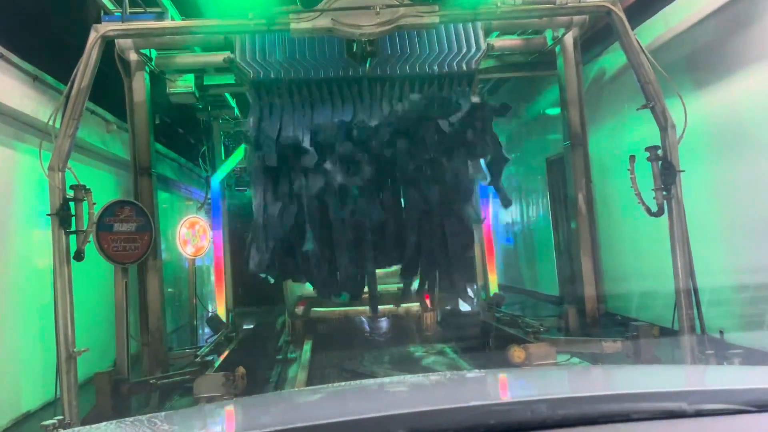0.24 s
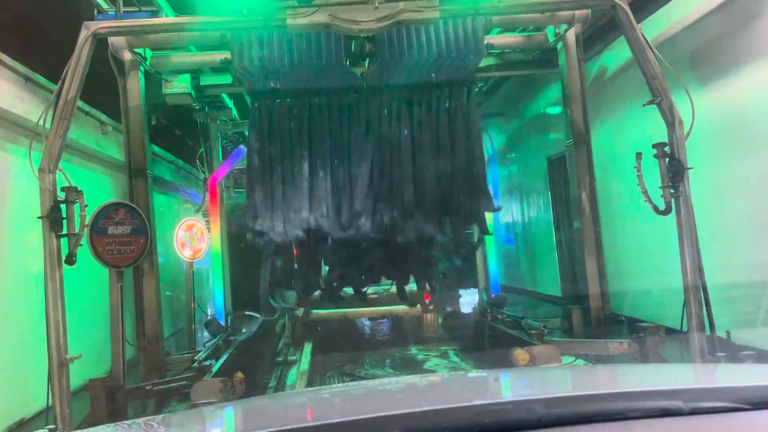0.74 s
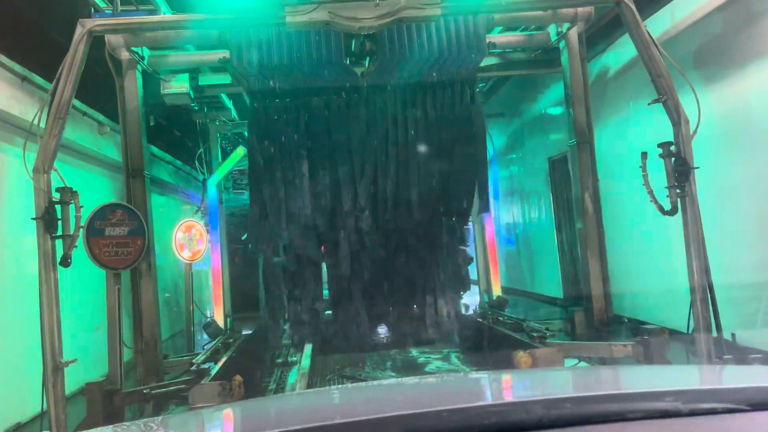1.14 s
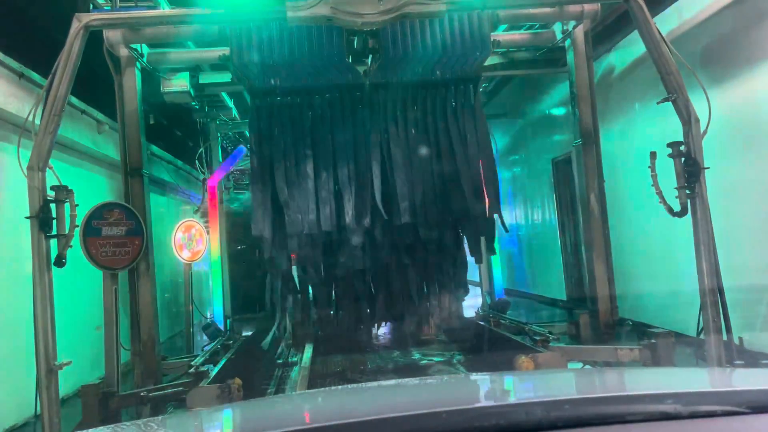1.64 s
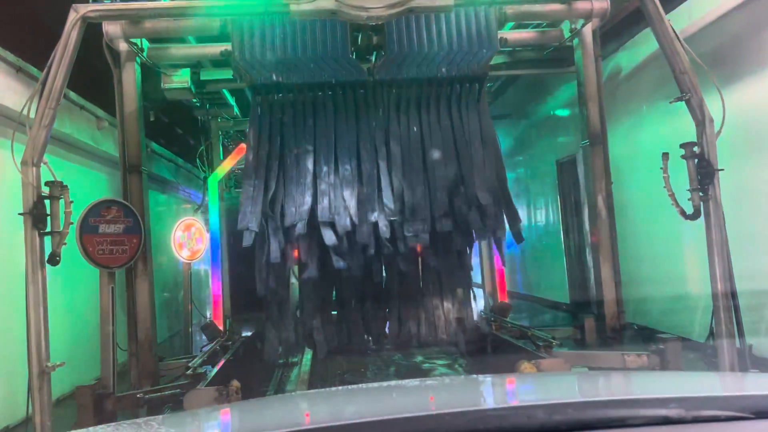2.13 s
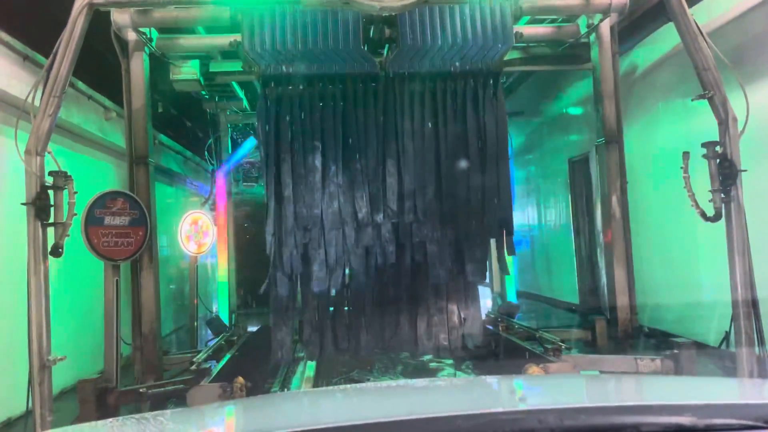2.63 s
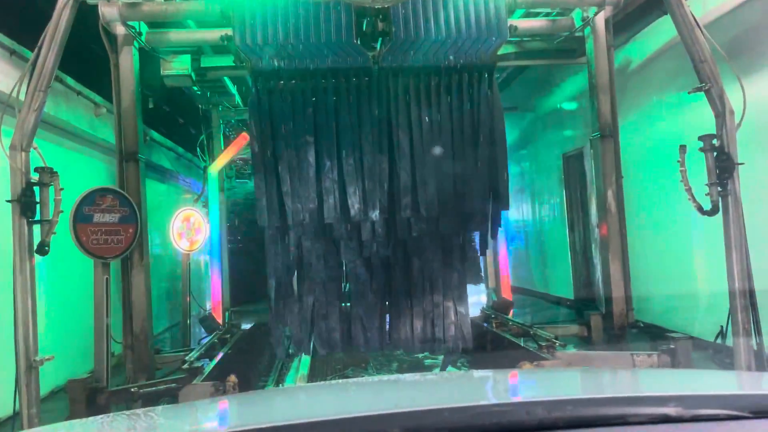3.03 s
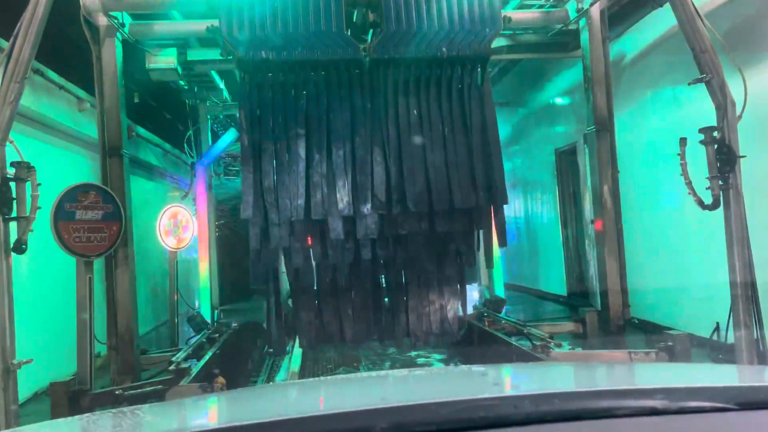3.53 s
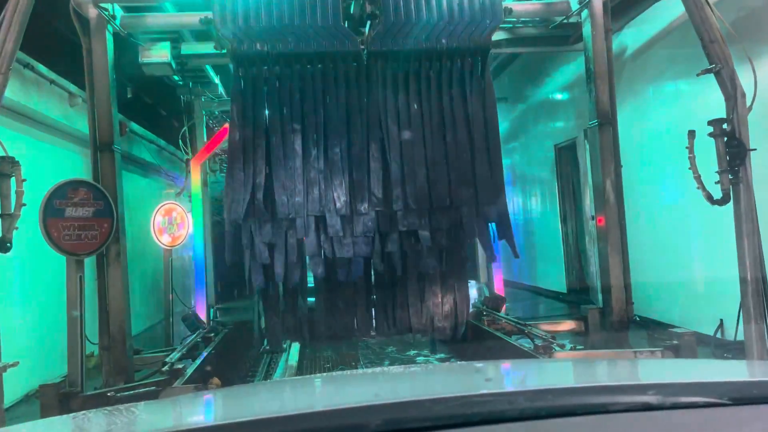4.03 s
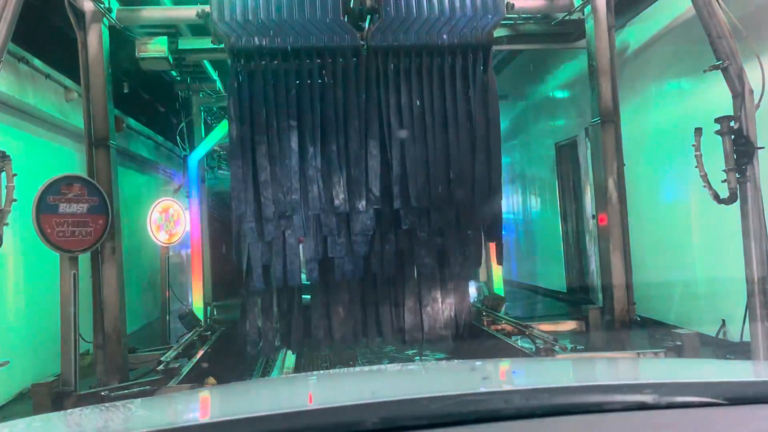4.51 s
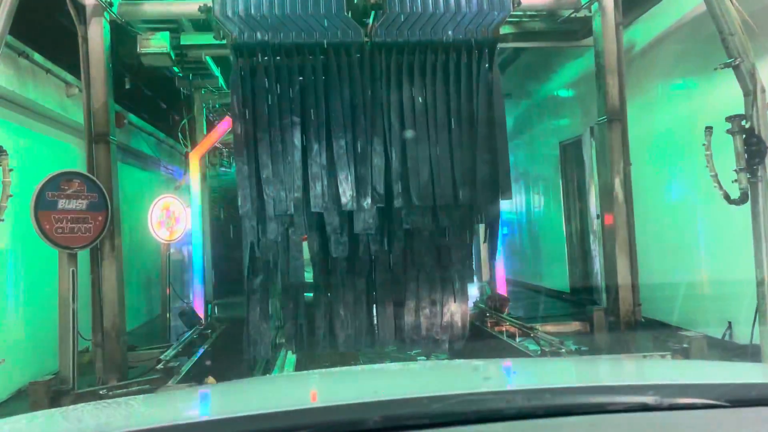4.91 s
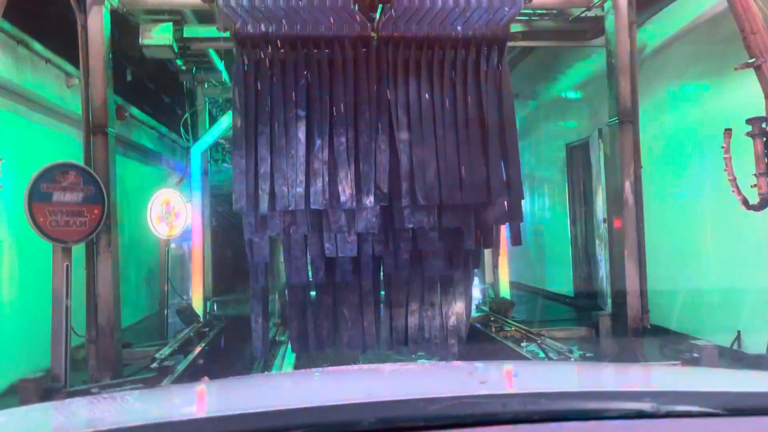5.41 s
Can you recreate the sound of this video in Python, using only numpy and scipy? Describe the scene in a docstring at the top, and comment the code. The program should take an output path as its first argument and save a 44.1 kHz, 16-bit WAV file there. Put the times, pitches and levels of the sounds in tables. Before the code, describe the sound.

Close microphone handling thumps and ticks over the steady low drone of car wash machinery outside the car.

```python
"""Inside a car in a wash tunnel

Pumps, motors and spray come muffled through the body of a closed car, which passes mostly bass.
Close by, a hand shifts its grip on the microphone housing: impacts give dull bumps and ticks, the
unsteady hand shakes it, and friction of skin and cloth rustles. Narrow hisses squeak a little."""
import sys
import numpy as np
from scipy import signal
from scipy.fft import rfft, irfft, next_fast_len
from scipy.io import wavfile
from scipy.ndimage import uniform_filter1d, minimum_filter1d

SR = 44100
rng = np.random.default_rng(int(sys.argv[2]) if len(sys.argv) > 2 else 0)


def transcribe(u):
    """Save the signal u as a 16-bit wav file named by the first command-line argument.

    u: samples, shape (n,) or (channels, n), limited to [-1, 1]; the rate is SR.
    q: integer samples, one column per channel.
    """
    v = np.clip(np.atleast_2d(u).T, -1, 1)
    q = np.round(v * 32767).astype(np.int16)
    wavfile.write(sys.argv[1], SR, q)


N = 249606


def gain_of(db):
    """Amplitude ratio of a level in decibels."""
    return 10 ** (np.asarray(db) / 20)


def unit_rms(x):
    """Normalisation to a mean power of 1."""
    return x / np.sqrt(np.mean(x ** 2) + 1e-20)


def curve_at(points, hz):
    """Interpolation on a logarithmic frequency axis."""
    knots_hz, values = np.transpose(points)
    return np.interp(np.log(hz + 1e-3), np.log(knots_hz + 1e-3), values)


def pan(left_db):
    """Level difference between the channels, as left and right gains."""
    return gain_of([left_db / 2, -left_db / 2])[..., None]


def add(mix, start_s, sound):
    """Superposition of a stereo sound on the mix."""
    part = mix[:, round(start_s * SR):][:, :sound.shape[1]]
    part += sound[:, :part.shape[1]]


def noise_pair(count, correlation):
    """Partial coherence: two channels of white noise share a component."""
    left, other = rng.standard_normal((count, 2)).T
    return np.array([left, correlation * left + np.sqrt(1 - correlation ** 2) * other])


def coloured(x, spectrum, tilt_db=0):
    """Zero-phase filtering by a spectrum, tilted by tilt_db an octave between 60 and 600 Hz."""
    size = x.shape[-1]
    hz = np.fft.rfftfreq(size, 1 / SR)
    octaves = np.log2(np.clip(hz, 60, 600) / 130)
    return irfft(rfft(x) * gain_of(curve_at(spectrum, hz) + tilt_db * octaves), size)


def resonant_noise(hz, width_hz, correlation):
    """Resonance by heterodyning: noise is shifted down by hz, smoothed twice and shifted back."""
    carrier = np.exp(2j * np.pi * hz * np.arange(N) / SR)
    pole = np.exp(-np.pi * width_hz / SR)
    baseband = signal.lfilter([1], [1, -2 * pole, pole ** 2], noise_pair(N, correlation) / carrier)
    return unit_rms((carrier * baseband).real)


def swell(start_s, rise_s, hold_s, fall_s, db, foot_db=-23):
    """Exponential rise up to start_s, hold and decay; subtracting the foot brings both ends to zero."""
    t = np.arange(N) / SR - start_s
    away = np.maximum(-t / rise_s, 0) + np.maximum((t - hold_s) / fall_s, 0)
    return gain_of(db) * np.maximum(gain_of(foot_db * away) - gain_of(foot_db), 0)


def flicker(depth_db, samples):
    """Random amplitude modulation: a gain whose level is smoothed noise."""
    return gain_of(depth_db * unit_rms(uniform_filter1d(rng.standard_normal(N), samples)))


def diffuse_noise(spectrum, patchy_db):
    """A partly coherent sound field: random short-time spectra with drifting louder patches."""
    # Each row: frequency in Hz, left-right correlation.
    coherence = [(60, 1), (150, 0.94), (360, 0.91), (900, 0.39), (2210, 0.018), (5440, 0.49), (13400, 0.1)]
    # Each row: frequency in Hz, excess of left over right in dB.
    balance = [(60, 0.5), (180, 0), (520, 0.86), (1540, 0.96), (4550, 0.0), (13400, 0.5)]
    frames, hz = N // 512 + 5, np.fft.rfftfreq(2048, 1 / SR)
    left_re, left_im, other_re, other_im, patches = rng.standard_normal((frames, len(hz), 5)).T
    patches = unit_rms(uniform_filter1d(uniform_filter1d(patches, 20, axis=0), 6, axis=1))
    correlation = curve_at(coherence, hz)[:, None]
    left = left_re + 1j * left_im
    right = correlation * left + np.sqrt(1 - correlation ** 2) * (other_re + 1j * other_im)
    gains = gain_of(curve_at(spectrum, hz)[:, None] + patchy_db * patches) * pan(curve_at(balance, hz))
    _, noise = signal.istft(gains * np.array([left, right]), nperseg=2048, noverlap=1536)
    return unit_rms(noise[:, :N])


def tunnel():
    """Transmission loss: the car body passes the machines' rumble and only a faint hiss of spray."""
    # Each row of both: frequency in Hz, relative spectral density in dB.
    rumble_spectrum = [(12, -39), (20, -8), (112, -1.5), (161, -7.5), (200, -9), (260, -12.5), (373, -16),
                       (404, -14), (483, -23), (524, -19.5), (556, -22.5), (1010, -34), (2400, -52.5),
                       (3120, -68.5), (5280, -120)]
    spray_spectrum = [(1200, -33), (2000, -2), (2500, -6), (3100, -3), (3700, -8.5), (4400, -5),
                      (5200, -12), (6200, -11.5), (6900, -21), (9500, -23), (10500, -50.5), (13000, -68)]
    # Each row: time in seconds, rumble level in dB, spray level in dB.
    drift = [(0.0, -26.5, -71.5), (0.3, -31.5, -67), (1.0, -30, -65), (1.6, -29.5, -67.5),
             (2.5, -29.5, -63.5), (3.4, -28.5, -63.5), (4.3, -29, -62.5), (4.9, -29, -61),
             (5.4, -28, -62.5), (5.66, -25, -63)]
    times_s, rumble_db, spray_db = np.transpose(drift)
    t = np.arange(N) / SR
    rumble = diffuse_noise(rumble_spectrum, patchy_db=1.4) * gain_of(np.interp(t, times_s, rumble_db))
    spray = diffuse_noise(spray_spectrum, patchy_db=2.05) * gain_of(np.interp(t, times_s, spray_db))
    return rumble + spray


def motor_hums():
    """Motors and pumps hum as narrow-band noise, which is heard as wavering tones."""
    # Each row: centre in Hz, width in Hz, level in dB.
    bands = [(33, 13, -40), (59.57, 4, -38), (523.3, 11, -52), (1032, 40, -63.5), (1618, 400, -63.5),
             (8500, 300, -92.5)]
    return sum(gain_of(db) * resonant_noise(hz, width_hz, correlation=.9 - hz / 12000)
               for hz, width_hz, db in bands)


def pulse(spectrum, size, tilt_db=0):
    """Windowed impulse response of a spectrum, with a peak of 1 at its middle."""
    response = coloured(signal.unit_impulse(size, "mid"), spectrum, tilt_db) * np.hanning(size)
    return response / abs(response).max()


def housing_bumps():
    """Impact: a soft push plus a knock of the stiffer shell, the hand being nearer the left port."""
    # Each row: time in seconds, push level in dB, hardness in dB an octave, knock level in dB.
    impacts = [(0.028, 0.5, 0.5, -35.5), (0.118, -20, -16, -40), (0.241, -22, -6, -37),
               (0.505, -1, -4, -30.5), (0.841, -14, 4, -41), (0.861, -11, 6.5, -26), (0.882, -8.5, -1, -25),
               (0.9, -12.5, 6.5, -48), (1.042, -18.5, -2, -44), (2.052, -11.5, -7.5, -43),
               (2.077, 7.5, 3.5, -20.5), (2.184, -27, -1, -30), (2.193, -9.5, -8, -40),
               (2.213, -16.5, 3.5, -25), (2.221, -7.5, 2.5, -40), (2.244, -12.5, 8, -22),
               (2.253, -5.5, 3, -44), (2.315, -6, 0.5, -21), (2.373, -15, 17.5, -26.5),
               (2.39, -15, 2, -24.5), (2.453, -7, 9, -52), (2.478, -11, -5.5, -46), (2.506, -22, 2, -42),
               (2.536, -17.5, -6.5, -38), (3.087, -6, 0.5, -16), (3.121, -4.5, -3, -19),
               (3.139, -9, -3.5, -54), (3.237, -3, -5, -27.5), (3.461, -16.5, 0, -46),
               (3.49, -19, 1.5, -51), (4.283, 9, 2, -17.5), (4.393, 1.5, -2.5, -27.5), (4.454, 0, -3, -27),
               (4.492, -8.5, -1.5, -50), (4.581, -6, -3, -39), (4.611, -6, -2, -32), (4.651, -5, 0.5, -42),
               (4.732, -7.5, -3, -47), (4.786, -5, -2, -30.5), (4.819, -13, -2, -31),
               (4.907, -9, -9.5, -46), (5.391, 3.5, 3, -10), (5.413, -9.5, -0.5, -27),
               (5.449, -34, -4.5, -28), (5.471, -19, 1, -27), (5.502, -19, -0.5, -31),
               (5.539, -15.5, -3, -22), (5.547, -11.5, -12, -19.5)]
    # Each row of both: frequency in Hz, relative level in dB.
    push_spectrum = [(25, -31.5), (50, -24.5), (70, -4), (100, -2.5), (140, 1.5), (200, -3.5), (280, -12.5),
                     (400, -22), (600, -37), (1000, -66.5), (2000, -140)]
    knock_spectrum = [(150, -51), (300, -15.5), (450, -0.5), (570, 8.5), (750, -10), (1000, -18.5),
                      (1600, -20), (3000, -64), (6000, -140)]
    out, size = np.zeros((2, N + SR)), 4096
    knock = pulse(knock_spectrum, size)
    for time_s, push_db, hardness_db, knock_db in impacts:
        push = pan(2.5) * gain_of(push_db) * pulse(push_spectrum, size, hardness_db)
        left, right = push + pan(2.2 * rng.uniform(-1, 1)) * gain_of(knock_db) * knock
        add(out, time_s, np.array([left, np.roll(right, 12)]))  # the far port hears it later
    return out[:, size // 2:][:, :N]  # centres each pulse on its time


def hand_shakes():
    """Structure-borne noise: the hand's low shaking and deeper sway reach both sides nearly alike."""
    # Each row: start in seconds, hold in seconds, level in dB.
    shakes = [(0.121, 0.086, -27), (0.853, .04, -21), (0.959, 0.1, -29.5), (1.991, 0.076, -22.5),
              (2.183, 0.082, -21.5), (2.345, .05, -23.5), (2.464, .05, -22), (3.11, .025, -17.5),
              (3.445, .07, -26.5), (5.415, 0.014, -23), (5.496, 0.077, -26)]
    # Each row: start, hold and fall in seconds, level in dB.
    sways = [(0.868, 0.024, 0.15, -13.5), (2.19, .07, .06, -21.5), (2.43, .06, .05, -28),
             (3.1, .015, .04, -15.5), (3.447, 0.097, .08, -30.5), (5.408, .02, .06, -21.5)]
    # Each row of both: frequency in Hz, relative spectral density in dB.
    shake_spectrum = [(40, -39), (75, 3.5), (120, 1.5), (180, -10.5), (300, -21.5), (600, -25),
                      (1200, -73.5), (2400, -140)]
    sway_spectrum = [(12, -37.5), (25, -2.5), (40, 1.5), (65, 13), (90, 8), (200, -65), (600, -140)]
    shake = unit_rms(coloured(noise_pair(N, correlation=.95), shake_spectrum))
    sway = unit_rms(coloured(noise_pair(N, correlation=1), sway_spectrum))
    shake_rise_s, shake_fall_s, sway_rise_s = .033, .05, .03
    shake *= sum(swell(start_s, shake_rise_s, hold_s, shake_fall_s, db) for start_s, hold_s, db in shakes)
    sway *= sum(swell(start_s, sway_rise_s, hold_s, fall_s, db) for start_s, hold_s, fall_s, db in sways)
    return pan(1.2) * (shake + sway)


def rubs():
    """Friction of skin and cloth gives grainy noise; a tilt trades its dull part for its bright part."""
    # Each row: start, rise, hold and fall in seconds, level in dB, tilt in dB.
    strokes = [(0.782, 0.079, 0.035, 0.028, -55, 2), (0.859, 0.063, 0.0055, 0.01, -47, 3),
               (.875, .005, .005, 0.1, -65, 7), (2.37, 0.0046, .005, 0.07, -60, 5.5),
               (2.457, 0.064, .003, .09, -53, 3), (2.755, 0.033, .003, .04, -62, 4),
               (3.087, .004, 0.037, 0.015, -44, 1), (3.198, 0.049, 0.021, 0.075, -52, -3.5),
               (5.383, .005, 0.074, .03, -60.5, 4.5), (5.527, 0.16, .06, 0.2, -47.5, -0.5)]
    # Each row: frequency in Hz, relative spectral density in dB.
    spectrum = [(500, -33.5), (900, -7), (1400, -2), (2000, -6), (3200, -15), (5500, -20), (9400, -20.5),
                (10100, -41.5), (11000, -29), (12500, -43)]
    grain = flicker(depth_db=2.3, samples=80)
    noise = unit_rms(coloured(grain * noise_pair(N, correlation=.29), spectrum))
    dull = signal.lfilter(*signal.butter(2, 3500, fs=SR), noise)
    bright = noise - dull
    return pan(2.5) * sum(swell(*shape) * (dull * gain_of(-tilt_db) + bright * gain_of(tilt_db))
                          for *shape, tilt_db in strokes)


def ticks():
    """Impulse excitation: a sharp click and its brief decaying crackle sound in three bands."""
    # Each row: time in seconds, then peak levels in dB of the dull, middle and bright bands before panning.
    clicks = [(0.786, -50, -48, -52), (0.815, -37, -36, -50), (0.827, -46, -58, -47),
              (0.841, -34, -52, -33), (0.853, -31, -39, -41), (0.865, -19.5, -28.5, -39),
              (0.874, -38, -48, -54), (0.882, -42, -68, -37.5), (2.184, -49, -61, -54),
              (2.212, -44, -67, -52), (2.243, -50, -67.5, -46), (2.375, -45, -63, -39),
              (2.455, -17, -30.5, -35), (2.471, -31.5, -40, -37), (2.48, -28.5, -40, -47),
              (2.497, -49, -50, -48), (2.529, -48, -50, -52), (2.742, -42, -56, -60),
              (3.084, -31, -43, -56), (3.12, -23.5, -26.5, -49), (3.432, -50, -47, -57),
              (4.587, -42, -47, -66), (4.804, -43, -44, -67), (5.376, -32.5, -54, -61),
              (5.39, -23, -41, -49), (5.4, -43, -43, -31), (5.415, -40, -39, -31), (5.537, -30, -55, -43),
              (5.593, -37, -63, -56.5)]
    # Each row of all three: frequency in Hz, relative level in dB.
    dull = [(300, -70), (700, 8), (1200, 4), (1700, -10), (2400, -23), (4000, -72), (8000, -120)]
    middle = [(600, -77.5), (1500, -9), (2100, -4), (2900, 1.5), (3700, -6), (4800, -21), (9000, -89)]
    bright = [(1200, -77.5), (3000, -21.5), (4300, -1.5), (5200, -2), (6300, -1.5), (9400, -7),
              (10100, -29.5), (12500, -27.5), (14000, -74)]
    out, t = np.zeros((2, N)), np.arange(-256, 768) / SR
    impulse = np.array([t == 0, np.roll(t == 0, 3)])  # slightly later on the right
    crackle_envelope = gain_of(-15 - 60 * t / .009) * (t > 0)  # falls 60 dB in 9 ms
    for time_s, *peaks_db in clicks:
        burst = impulse + crackle_envelope * noise_pair(len(t), correlation=.4)
        place = pan(6 + 7.5 * rng.uniform(-1, 1))
        for db, spectrum in zip(peaks_db, (dull, middle, bright)):
            band = coloured(burst, spectrum)
            add(out, time_s + t[0], gain_of(db) * place * band / abs(band).max())
    return out


def hisses():
    """Band-limited noise: one resonance gives each fluttering hiss a slight squeak."""
    # Each row: start, rise, hold and fall in seconds, level in dB, centre in Hz, width in Hz.
    bands = [(2.88, 0.046, 0.058, .05, -56, 3360, 2100), (5.05, 0.11, .1, .3, -67, 3000, 600),
             (5.12, .15, 0.33, .03, -74, 6050, 500), (5.5, .15, 0.12, .06, -60, 4350, 400),
             (5.49, .06, 0.12, .1, -59, 6250, 900)]
    flutter = flicker(depth_db=2.5, samples=700)
    return flutter * sum(swell(*shape) * resonant_noise(hz, width_hz, correlation=.51)
                         for *shape, hz, width_hz in bands)


def scene():
    """Superposition of the wash outside and the handling noise close by."""
    return tunnel() + motor_hums() + housing_bumps() + hand_shakes() + rubs() + ticks() + hisses()


def record(dry):
    """Dispersion delays the bass, so bumps sweep downward; peaks are limited and both band edges cut."""
    size = next_fast_len(N + SR // 4)
    hz = np.fft.rfftfreq(size, 1 / SR)
    low_edge_hz, high_edge_hz, leak_hz, ceiling = 29, 12600, 11970, .91
    group_delay_s = .0145 * (100 / np.maximum(hz, 55)) ** 1.2
    phase_turns = np.cumsum(group_delay_s[::-1])[::-1] * SR / size
    low_cut = 1 / np.sqrt(1 + (low_edge_hz / (hz + 1e-3)) ** 16)
    swept = irfft(rfft(dry, size) * low_cut * np.exp(2j * np.pi * phase_turns), size)[:, :N]
    safe_gain = np.minimum(ceiling / (abs(swept).max(0) + 1e-9), 1)
    limited = swept * uniform_filter1d(minimum_filter1d(safe_gain, size=201), size=201)
    # Loud bass leaks faintly into the treble as sidebands of a high carrier.
    mono = limited.mean(0)
    carrier = np.cos(2 * np.pi * leak_hz * np.arange(N) / SR)
    leak = gain_of(-64) * mono * np.tanh(abs(mono) / .2) * carrier
    high_cut = signal.firwin(511, high_edge_hz, window=("kaiser", 9), fs=SR)
    return signal.oaconvolve(limited + leak, high_cut[None], "same")


dry = scene()
out = record(dry)
transcribe(out)
```